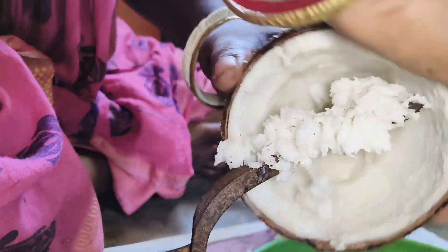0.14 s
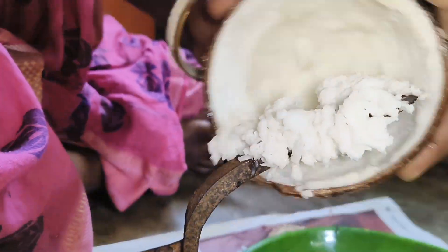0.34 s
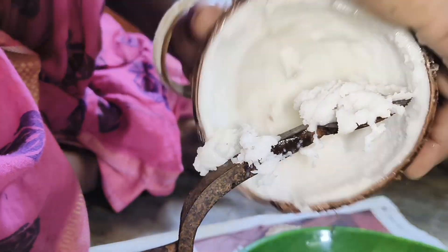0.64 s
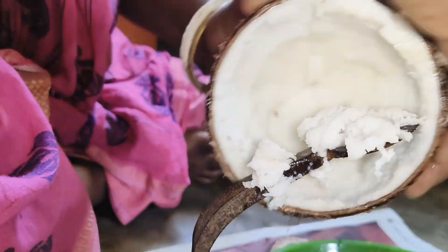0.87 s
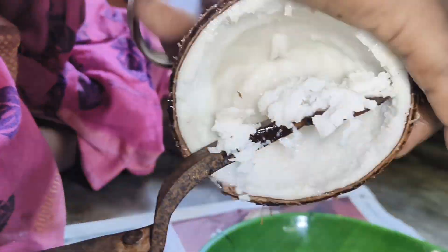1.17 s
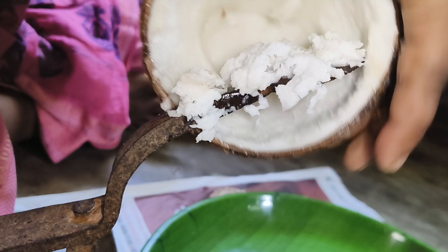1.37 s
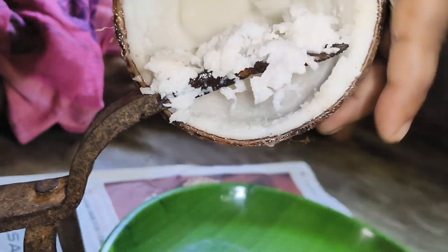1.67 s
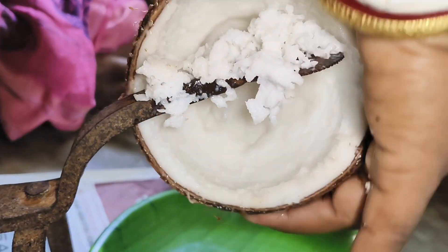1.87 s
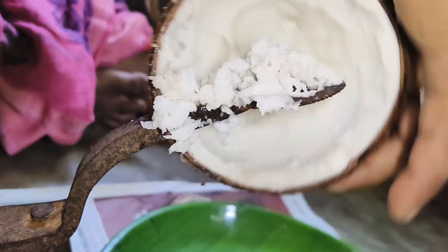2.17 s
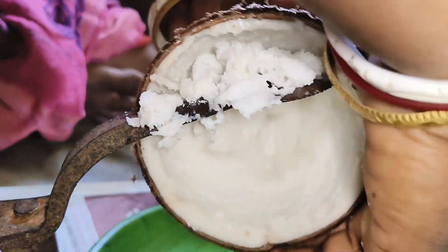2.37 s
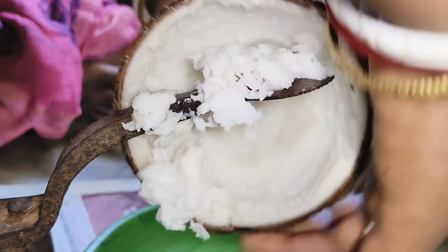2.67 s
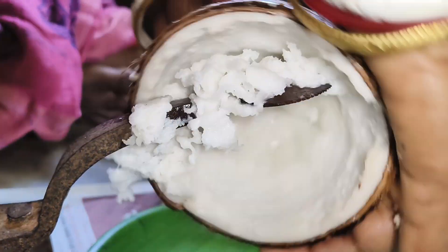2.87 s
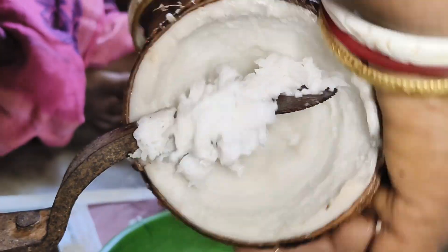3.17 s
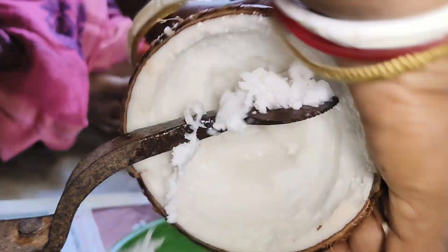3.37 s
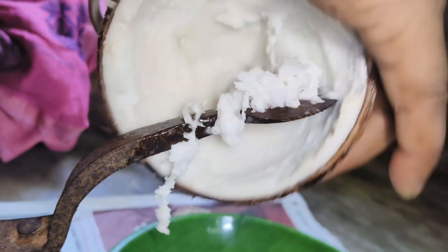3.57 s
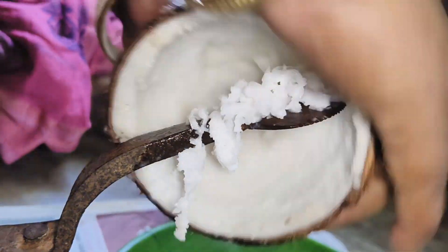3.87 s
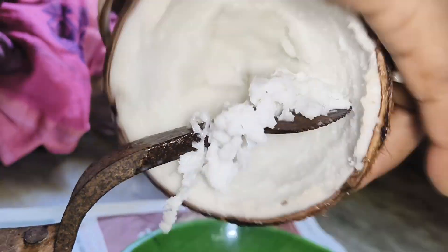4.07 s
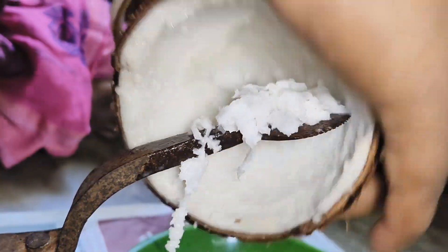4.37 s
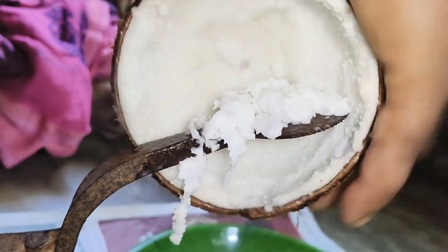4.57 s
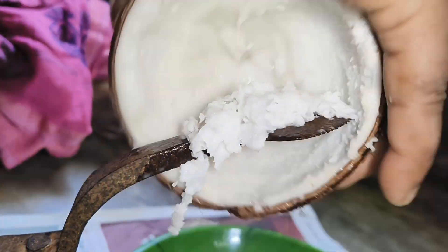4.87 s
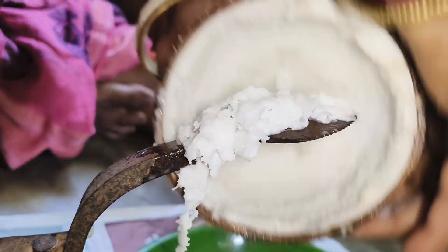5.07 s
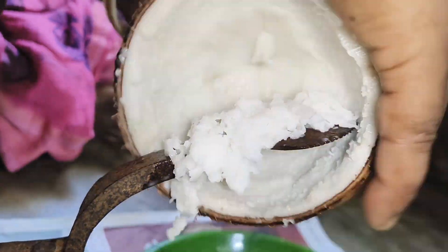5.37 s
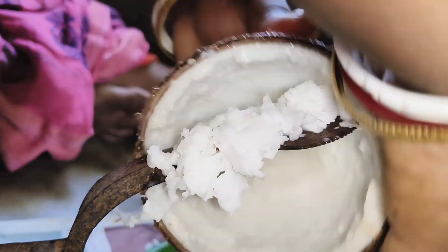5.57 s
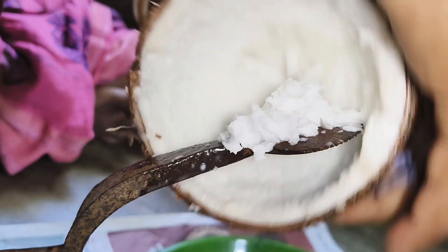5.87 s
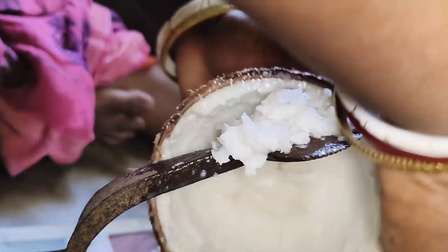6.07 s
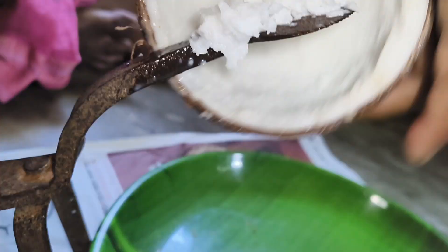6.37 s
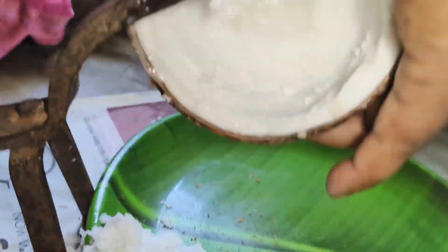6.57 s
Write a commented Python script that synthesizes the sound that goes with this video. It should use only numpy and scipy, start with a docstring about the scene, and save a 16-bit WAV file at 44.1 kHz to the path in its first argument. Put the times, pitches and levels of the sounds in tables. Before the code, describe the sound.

In a kitchen, heard close on a phone, half a coconut is grated against an iron blade at about four rasping strokes a second. The stand thrums and thuds under the load, and the shell drags, knocks and ticks between strokes. The blade squeaks faintly at first. Bangles clink now and then. The hardest knocks come late, and the squeak returns on the last strokes.

```python
"""A kitchen, close up, on a phone with two microphone ports: a half coconut is grated on an iron blade.
From the start, about four strokes a second: teeth tear the flesh, ringing blade and shell, and the
stand thrums under the load. The blade squeaks faintly for the first second. Between strokes the shell
drags back, knocks and ticks. Bangles clink at the outset, near 2 s and before 4 s. The hardest knocks
come after 5 s; one more clink follows, and the squeak returns on the last strokes."""
import sys
import numpy as np
from scipy import signal
from scipy.io import wavfile
from scipy.ndimage import uniform_filter1d

SR = 44100
rng = np.random.default_rng(int(sys.argv[2]) if len(sys.argv) > 2 else 0)


def unload_audio(sound):
    """Save the sound as a 16-bit wav file, at the path given as the first command line argument."""
    columns = np.transpose(np.atleast_2d(sound))
    # keep every value between -1 and 1, then stretch to whole-number steps
    steps = np.round(np.clip(columns, -1, 1) * 32767)
    wavfile.write(sys.argv[1], SR, steps.astype(np.int16))


N = 296677
PORT_LEAD = 13  # samples by which the left port hears earlier

# Strokes over the blade: (plateau start [s], plateau length [s], nominal rise [s], tearing level [dB],
# shell level [dB], shell swell [dB], most excited shell pitch [Hz], stand level [dB])
STROKES = [(0.004, 0.031, 0.12, -15, -29, -17, 2740, -28.5),
           (0.212, 0.072, 0.017, -10, -18.5, -3, 2660, -29.5),
           (0.452, 0.1, 0.0087, -14, -17, -2.5, 2470, -25.5),
           (0.729, 0.088, 0.057, -15, -17.5, 1, 2680, -24),
           (0.98, 0.018, 0.012, -18, -23.5, -10, 3240, -32),
           (1.029, 0.052, 0.031, -11, -12.5, -5, 3200, -22),
           (1.261, 0.082, 0.023, -9.5, -10, 4.5, 4500, -22.5),
           (1.523, 0.1, 0.01, -15.5, -14.5, -4.5, 2520, -23.5),
           (1.797, 0.086, 0.03, -15, -17.5, -3.5, 2620, -22),
           (2.052, 0.092, 0.017, -13.5, -18.5, -3.5, 3300, -27),
           (2.322, 0.11, 0.012, -16, -14.5, -2.5, 2140, -21), (2.577, 0.11, 0.024, -17, -19, -3, 2530, -27),
           (2.852, 0.084, 0.026, -15.5, -17, 1.5, 3080, -25),
           (3.098, 0.098, 0.058, -13.5, -18, 6, 3100, -28.5),
           (3.359, 0.078, 0.046, -14.5, -18.5, 8, 3000, -24),
           (3.639, 0.075, 0.12, -17, -18, 1, 3230, -28.5),
           (3.903, 0.095, 0.0064, -13.5, -14.5, -1, 3000, -25),
           (4.165, 0.093, 0.02, -16, -18, 10.5, 3370, -28),
           (4.429, 0.1, 0.035, -15, -20, 13.5, 3600, -31.5),
           (4.623, 0.0072, 0.027, -20.5, -20.5, 0, 2800, -37),
           (4.706, 0.085, 0.009, -13, -11.5, -0.5, 2750, -23.5),
           (4.974, 0.095, 0.096, -16, -17, 6, 3340, -29), (5.223, 0.09, 0.025, -16, -19, 3.5, 2710, -27.5),
           (5.485, 0.11, 0.029, -16.5, -16.5, 10.5, 3260, -27),
           (5.76, 0.075, 0.024, -14.5, -16, -1.5, 3160, -26),
           (6.009, 0.094, 0.015, -14.5, -16, 12.5, 3600, -28),
           (6.272, 0.092, 0.044, -18, -16.5, 3, 3400, -28),
           (6.523, 0.081, 0.003, -14.5, -16, -3, 3450, -24.5)]
# Modes of the shell: (frequency [Hz], gain [dB], ring time to -60 dB [s], left minus right [dB])
SHELL_MODES = [(560, 3, 0.03, 10.5), (1103, -1.5, 0.025, 14), (1344, 2, 0.022, -7.5), (1860, 0, 0.024, -6),
               (2286, 2, 0.022, 5), (3050, -6.5, 0.013, -6), (3536, -6, 0.014, 19.5),
               (4240, -0.5, 0.025, 8.5)]
# Modes of the blade: (frequency [Hz], width [Hz], gain [dB], left minus right [dB])
BLADE_MODES = [(4670, 650, -12.5, -14), (6335, 580, 2, 4.5), (7340, 305, 0, -1), (9155, 200, -0.5, 8.5),
               (11520, 380, -2.5, -2.5), (13400, 760, -2.5, 14), (14740, 220, 6, 2.5),
               (15230, 2900, -0.5, 6.5)]


def rasp():
    """The teeth bite unevenly into the flesh, driving blade and shell; the drag back crackles."""
    *_, tear_db, shell_db, swell_db, _, _ = np.transpose(STROKES)
    drag = undb(drag_db() + 4.4 * walk(40))
    tearing = stroke_gain(tear_db[:, None] + (0.5, 2, -3), edge_db=27, stretch=0.78) + drag
    pressure = stroke_gain(swelling(shell_db, swell_db) + (-4, 0.5, -4), edge_db=40, stretch=0.89)
    pressure += undb(-7.5 + 2.8 * walk(20)) * drag
    bite = undb(1.77 * walk(40) + 1.6 * walk(260)) * snags()
    fine, coarse = grains(alike=0.21, spread_db=1.7), grains(alike=0.5, spread_db=2.5)
    blade = blade_ring(fine)
    shell = shell_ring(coarse) + squeaks(coarse)
    scrape = tearing * catches() * blade
    body = pressure * (catches() * shell + undb(-8) * crunch(per_s=45))
    crackle = drag * undb(-6.5) * crunch(per_s=14)
    return bite * (scrape + body) + crackle


def blade_ring(clicks):
    """Tearing rings the iron: a bright hiss and high modes whose levels wander."""
    out = undb(-8.5) * ports(5) * band(clicks, 7700, 16750)
    for k, (hz, width, db, pan) in enumerate(BLADE_MODES):
        out += (-1) ** k * undb(db + 3 * walk(30)) * ports(pan) * band(clicks, hz, width)
    return steady(out, 0.035)


def shell_ring(clicks):
    """Tearing rings the shell; grip and heaped flesh change which modes sound from moment to moment."""
    start, length, *_, stroke_hz, _ = np.transpose(STROKES)
    favoured_hz = curve(np.column_stack([start + length / 2, stroke_hz]))
    out = undb(-15.5) * band(clicks, 2900, 6800)
    for k, (hz, db, t60, pan) in enumerate(SHELL_MODES):
        reach_db = -9 * np.abs(np.log2(hz / favoured_hz)) + 3.9 * walk(30)
        width = 4.7 / t60  # pressed flesh damps the shell and widens its modes
        out += (-1) ** k * undb(db + 15 + reach_db) * ports(pan) * band(clicks, hz, width)
    return steady(out, 0.06)


def squeaks(clicks):
    """The blade squeaks in a narrow band while the grip leaves it free."""
    # Spells of squeaking: (start [s], end [s], frequency [Hz], width [Hz], gain [dB])
    spells = [(-1, 1.12, 3605, 130, -5.5), (6.075, 6.11, 3300, 300, -1.5), (6.27, 6.63, 3420, 330, -9)]
    out = 0
    for start, end, hz, width, db in spells:
        gate = curve([(start - 0.02, 0), (start, 1), (end, 1), (end + 0.022, 0)])
        out += undb(db) * gate * unit(band(band(clicks, hz, width), hz, width))
    return out


def grains(alike, spread_db, lead=PORT_LEAD):
    """Dense clicks of uneven size; the share `alike` of their power is common to both ports."""
    size = undb(spread_db * rng.exponential(size=N))
    shared, left, right = rng.standard_normal((3, N)) * size
    common = np.array([shared, np.roll(shared, lead)])
    return np.sqrt(alike) * common + np.sqrt(1 - alike) * np.array([left, right])


def crunch(per_s, cycles=5):
    """Wet fibres burst: sparse pops a few cycles long, `per_s` a second at each of eleven pitches."""
    out = 0
    for hz in np.geomspace(1050, 6200, num=11):
        pops = (rng.random(N) < per_s / SR) * rng.standard_normal(N)
        pair = np.array([pops, np.roll(pops, PORT_LEAD)]) * ports(4.6)
        out += band(pair, hz, hz / cycles) * np.sqrt(cycles / hz)
    return unit(out)


def catches(per_s=260, decay_s=0.0017):
    """Single teeth catch at random: the gain jumps and dies away."""
    jumps = (rng.random(N) < per_s / SR) * rng.exponential(size=N) * undb(-7)
    return unit(1 + signal.lfilter([1], [1, -np.exp(-1 / (decay_s * SR))], jumps))


def snags(rise_s=0.0019, fall_s=0.0031):
    """A tooth snags in the flesh: the gain of the bite leaps and falls back."""
    # Snagging teeth: (time [s], jump [dB])
    leaps = [(0.47, 10.5), (0.519, 5), (1.319, 8), (1.864, 4), (2.074, 8), (2.33, 9), (2.386, 10),
             (2.611, 10), (3.398, 8), (3.434, 10), (4.799, 9), (5.302, 18), (5.841, 11), (6.092, 11)]
    t, db = np.arange(N) / SR, np.zeros(N)
    for s, jump_db in leaps:
        near = slice(int((s - 0.01) * SR), int((s + 0.05) * SR))
        since = t[near] - s
        rise, fall = np.clip(since / rise_s, 0, 1), np.exp((rise_s - since) / fall_s)
        db[near] += jump_db * np.where(since < rise_s, rise, fall)
    return undb(db)


def drag_db(let_go_db=-33, fade_db_per_s=204):
    """The shell slides off after a stroke, fades, touches again and drags on into the next."""
    # The shell meets the blade on its way back: (time [s], drag level [dB])
    returns = [(0.108, -39.5), (0.387, -31.5), (0.668, -36.5), (0.924, -27.5), (1.176, -33.5), (1.423, -35),
               (1.695, -39), (1.922, -35.5), (2.259, -37.5), (2.506, -34.5), (2.777, -36.5), (3.011, -46),
               (3.304, -41.5), (3.575, -33.5), (3.79, -35), (4.112, -45), (4.334, -40.5), (4.589, -39),
               (4.654, -36), (4.874, -45), (5.172, -32.5), (5.366, -37.5), (5.679, -30.5), (5.933, -34.5),
               (6.219, -40), (6.472, -33), (6.692, -26)]
    start, length, *_ = np.transpose(STROKES)
    ends, points = start + length, []
    for touch, db in returns:
        end = ends[ends < touch].max()
        lifted_db = let_go_db - fade_db_per_s * (touch - end)
        until = max(min(start[start > touch], default=0), touch + 0.022)
        points += [(end, let_go_db), (touch - 0.004, lifted_db), (touch + 0.0071, db), (until, db)]
    return curve(sorted(points))


def stroke_gain(levels_db, edge_db, stretch):
    """Each stroke rises by edge_db, passes through its three levels and lets go with a lingering fall."""
    t, gain = np.arange(N) / SR, np.zeros(N)
    fall_s = stretch * 0.037
    for (start, length, rise, *_), db in zip(STROKES, levels_db):
        end = start + length
        times = [start - stretch * rise, start, start + length / 2, end, end + 0.57 * fall_s, end + fall_s]
        levels = [db[0] - edge_db, *db, db[-1] - 0.39 * edge_db, db[-1] - edge_db]
        near = slice(max(int(times[0] * SR), 0), int(times[-1] * SR))
        gain[near] += undb(np.interp(t[near], times, levels))
    return gain


def swelling(db, swell_db):
    """Levels at the start, middle and end of each stroke."""
    return db[:, None] + swell_db[:, None] * np.array([-1, 0, 1]) / 2


def knocks(hard_hz=2120):
    """The shell knocks on the blade; knocks pitched under hard_hz land on flesh, broad and damped."""
    # Knocks of the shell: (time [s], peak before the low cut [dB], most excited pitch [Hz])
    hits = [(0.116, -15, 2060), (0.19, -8.5, 3630), (0.7, -12, 1690), (0.886, -12, 1590),
            (0.938, -13, 3640), (1.185, -4, 2080), (1.481, -16, 1200), (1.521, -5.5, 1220),
            (1.932, -6.5, 1030), (2.029, -6.5, 1250), (2.277, -3.5, 1090), (2.318, -7.5, 1250),
            (2.369, 0.5, 1320), (2.515, -6.5, 1080), (2.541, -4.5, 1280), (2.787, -10, 2200),
            (3.527, -19, 2280), (3.709, -6.5, 2300), (3.581, -17.5, 1380), (3.797, -15, 2540),
            (4.12, -9.5, 2230), (4.236, 2, 3500), (4.295, -11.5, 2300), (4.34, -19, 2230),
            (4.38, -14.5, 1900), (4.595, -10.5, 2320), (4.881, -8, 2170), (5.234, 8, 2290),
            (5.371, -12, 600), (5.373, 5.5, 2200), (5.413, 3, 2320), (5.639, -17, 460), (5.665, -25, 1300),
            (6.152, -11.5, 1210), (6.172, -18, 2270), (6.249, -5.5, 1160), (6.519, -25, 1160),
            (6.643, -17, 1480)]
    out = np.zeros((2, N))
    hz, db, t60, pan = np.transpose(SHELL_MODES)
    for s, peak_db, pitch in hits:
        rattle_s = 0.014 * (pitch / 1000) ** -0.55  # harder, higher knocks rattle for less
        hardness = min(pitch / hard_hz, 1)
        uneven, detune = rng.standard_normal((2, len(hz)))
        gain_db = db - 26 * hardness * np.abs(np.log2(hz / pitch)) + 0.38 * uneven
        knock = blow(peak_db, hz * (1 + 0.028 * detune), gain_db, t60 * hardness, pan, rattle_s,
                     crack_db=1, crack_hz=0.76 * pitch)
        low_cut = signal.butter(1, 0.3 * pitch, "high", fs=SR)
        add(out, s, signal.lfilter(*low_cut, knock))
    return out


def ticks():
    """A tooth catches the rim: a dry crack and a short ring of the blade."""
    # Ticks on the rim: (time [s], peak [dB])
    hits = [(0.113, -14), (0.395, -15), (0.887, -13), (1.238, -6), (2.8145, -9), (3.796, -15), (4.145, -4),
            (4.37, -19), (4.694, -8), (4.881, -16), (5.1776, -22), (5.3717, -14), (5.45, -6.5),
            (5.9907, -16), (6.5133, -8)]
    out = np.zeros((2, N))
    hz, width, db, pan = np.transpose(BLADE_MODES)
    t60 = np.log(1000) / (np.pi * width)
    for s, peak_db in hits:
        add(out, s, blow(peak_db, hz, db, t60, pan, rattle_s=0.0035, crack_db=-4, crack_hz=7700))
    return out


def bangles():
    """Two bangles touch and ring; harder touches chatter for longer."""
    # Touches of the bangles: (time [s], peak [dB], bangle [name])
    clinks = [(0.163, -16, "thin"), (0.185, -13, "thin"), (1.695, -28, "wide"), (1.929, -4, "thin"),
              (1.969, -8, "wide"), (2.0053, -14.5, "wide"), (2.05, -11, "wide"), (3.628, -3, "wide"),
              (3.74, -18, "thin"), (3.816, -34, "wide"), (3.882, -12, "thin"), (5.684, -19, "wide")]
    # Modes of the thin and the wide bangle: (frequency [Hz], gain [dB], ring time to -60 dB [s])
    modes = {"thin": [(5620, -7, 0.081), (7660, -6, .055), (8120, -6, .08), (9250, -13, 0.058),
             (11030, 6, 0.052), (12900, -7, .04), (14350, -2, .035), (15100, -11, .035)],
             "wide": [(6250, -5, 0.076), (9170, -1, .07), (12000, 3, 0.11), (14590, -5, .06)]}
    out = np.zeros((2, N))
    for s, peak_db, which in clinks:
        hz, db, t60 = np.transpose(modes[which])
        uneven, detune, side = rng.standard_normal((3, len(hz)))
        rattle_s = 0.028 * 2 ** (peak_db / 9)  # doubles every 9 dB
        clink = blow(peak_db, hz * (1 + 0.003 * detune), db + 2.8 * uneven, t60, 3 + 3 * side, rattle_s,
                     crack_db=-16.5, crack_hz=11000)
        add(out, s, clink)
    return out


def blow(peak_db, hz, gain_db, t60, pan_db, rattle_s, crack_db, crack_hz):
    """A firm first contact and a rattle of smaller ones, each a crack that rings the modes."""
    t = np.arange(int(0.15 * SR)) / SR
    decay = np.exp(-np.log(1000) * t[:, None] / t60)
    modes = np.sin(2 * np.pi * hz * t[:, None]) * decay * undb(gain_db)
    ring = np.array([modes @ undb(pan_db / 2), modes @ undb(-pan_db / 2)])
    noise = rng.standard_normal((3, len(t)))
    burst = noise[:2] * np.exp(-t / 0.0012)
    crack = band(band(burst, crack_hz, 1.2 * crack_hz), crack_hz, 1.2 * crack_hz)
    hit = ring / np.abs(ring).max() + undb(crack_db) * crack
    contacts = noise[2] ** 3 * np.exp(-(t / rattle_s) ** 2)
    contacts[0] = 1.33 * np.abs(contacts).max()
    pair = signal.fftconvolve(hit, contacts[None], axes=1)[:, :len(t)]
    return pair * undb(peak_db) / np.abs(pair).max()


def stand():
    """The juddering blade shakes the low modes of its stand, which never quite rest."""
    # Modes of the stand: (frequency [Hz], nominal width [Hz], gain [dB])
    modes = [(61.3, 26, -18), (151.7, 31.7, 0), (206.4, 42, 1), (245.6, 57.4, -2), (324.7, 152, -15)]
    load = stroke_gain(load_db(), edge_db=52.5, stretch=1.58) + undb(-42 + 3 * walk(6.4))
    judder = grains(alike=0.94, spread_db=3.3, lead=3)
    thrum = sum(undb(db) * band(band(judder, hz, 1.37 * width), hz, 1.37 * width)
                for hz, width, db in modes)
    return band(load * steady(thrum, 0.063), 198, 550)


def load_db():
    """The load on the stand changes through a stroke, growing most where the shell swells."""
    *_, swell_db, _, stand_db = np.transpose(STROKES)
    return swelling(stand_db, 6 + 0.98 * swell_db)


def jolts(pitch_hz=222, swell_s=0.014):
    """The blade digs in and jolts the stand: one low thud, its pitch a little different each time."""
    # Thuds of the stand: (time [s], peak [dB])
    thuds = [(1.064, -16.5), (1.329, -16), (1.56, -15.5), (1.808, -18.5), (1.858, -18), (2.35, -12),
             (2.598, -12.5), (2.867, -17), (3.118, -17.5), (3.929, -17.5), (4.233, -13), (4.764, -17.5),
             (5.007, -17)]
    out, t = np.zeros((2, N)), np.arange(int(0.15 * SR)) / SR
    envelope = t / swell_s * np.exp(1 - t / swell_s)
    for s, peak_db in thuds:
        hz = pitch_hz * (1 + 0.039 * rng.standard_normal())
        note = undb(peak_db) * envelope * np.sin(2 * np.pi * hz * t)
        add(out, s, np.array([note, note]))
    return out


def grip_rumble():
    """The grip feels half the stand's load in dB and thuds on each stroke, louder at the left port."""
    push = stroke_gain(0.5 * load_db(), edge_db=30, stretch=0.5) + undb(-19)
    noise = unit(band(grains(alike=0.84, spread_db=0, lead=0), 87, 150))
    thuds = band(noise * push * undb(1.3 * walk(4.5)), 78, 185)
    return undb(-24) * thuds * ports(2.1)


def kitchen_tail(dry, t60=0.13, level_db=-17):
    """The kitchen returns a short diffuse tail, unrelated at the two ports."""
    t = np.arange(int(0.3 * SR)) / SR
    envelope = np.exp(-np.log(1000) * t / t60) * (t > 0.004)
    tail = band(rng.standard_normal((2, len(t))) * envelope, 2200, 4200)
    tail /= np.sqrt(np.sum(tail ** 2, axis=1, keepdims=True))
    return undb(level_db) * signal.fftconvolve(dry, tail, axes=1)[:, :N]


def room_tone():
    """Faint, steady noise of the room, mostly different at each port."""
    return undb(-43) * unit(band(grains(alike=0.17, spread_db=0), 350, 1200))


def undb(db):
    return 10 ** (np.asarray(db) / 20)


def unit(x):
    return x / np.sqrt(np.mean(x ** 2))


def curve(points):
    """Straight lines through (time [s], value) points, one value a sample."""
    return np.interp(np.arange(N) / SR, *np.transpose(points))


def band(x, hz, width):
    """Resonance with gain 1 at its centre."""
    return signal.lfilter(*signal.iirpeak(hz, hz / width, SR), x)


def walk(per_s):
    """Glides between random levels, per_s of them a second; RMS 1."""
    hold = int(SR / per_s)
    steps = np.repeat(rng.standard_normal(N // hold + 1), hold)
    return unit(uniform_filter1d(steps, hold)[:N])


def steady(x, span_s):
    """Divides the slow swell out, so that only the colour wanders."""
    return x / np.sqrt(uniform_filter1d(np.mean(x ** 2, axis=0), int(span_s * SR)))


def ports(pan_db):
    """Left and right gains for a level difference."""
    return undb(np.array([[pan_db], [-pan_db]]) / 2)


def add(out, s, pair):
    """Mixes a sound in at time s, later at the right port."""
    for channel, lag in enumerate((0, PORT_LEAD)):
        at = int(s * SR) + lag
        out[channel, at:at + pair.shape[1]] += pair[channel, :N - at]


def scene():
    """Grating and bangles up close with a little kitchen around them, over the low sounds and room tone."""
    close = rasp() + knocks() + bangles() + ticks()
    return close + kitchen_tail(close) + stand() + jolts() + grip_rumble() + room_tone()


def record(dry):
    """The phone clips peaks near full scale and cuts the treble above 15750 Hz."""
    high_cut = signal.ellip(10, 0.2, 80, 15750, fs=SR, output="sos")
    return signal.sosfilt(high_cut, np.clip(dry, -0.97, 0.97))


dry = scene()
out = record(dry)
unload_audio(out)
```